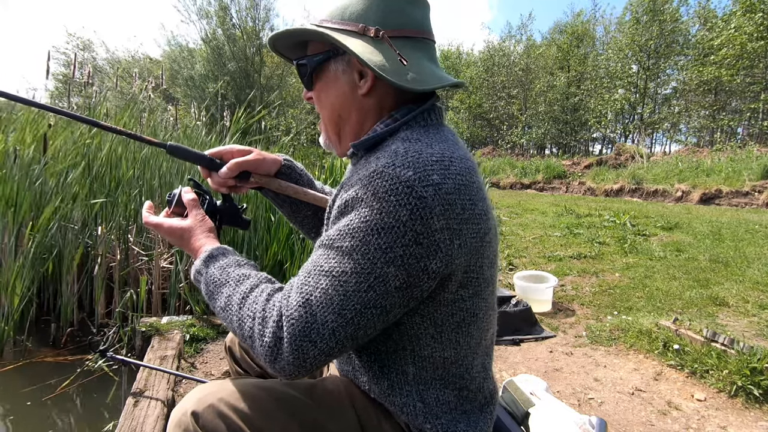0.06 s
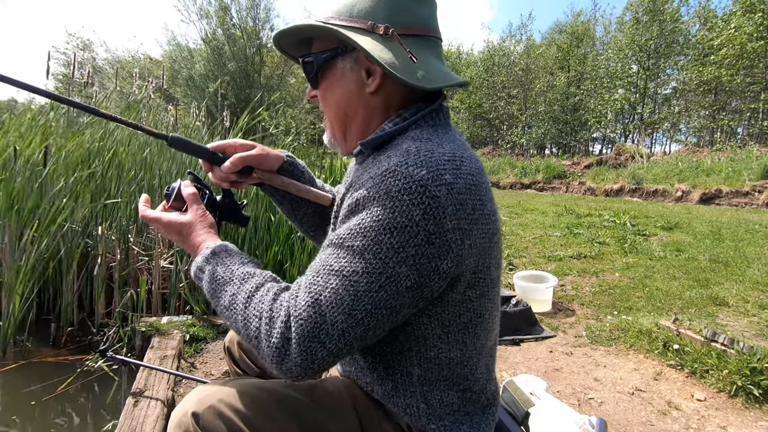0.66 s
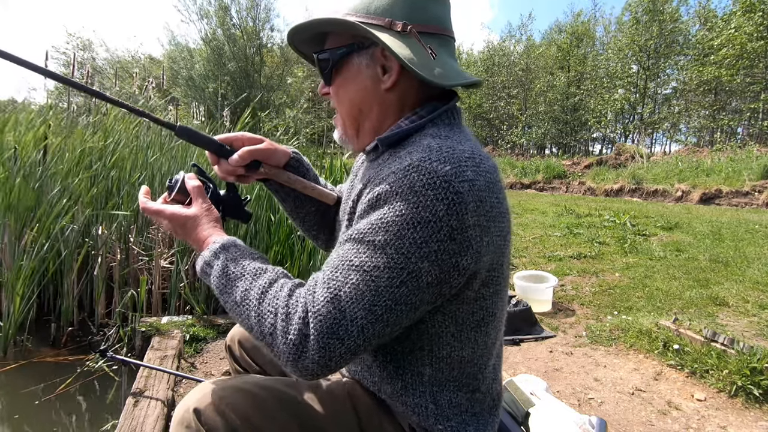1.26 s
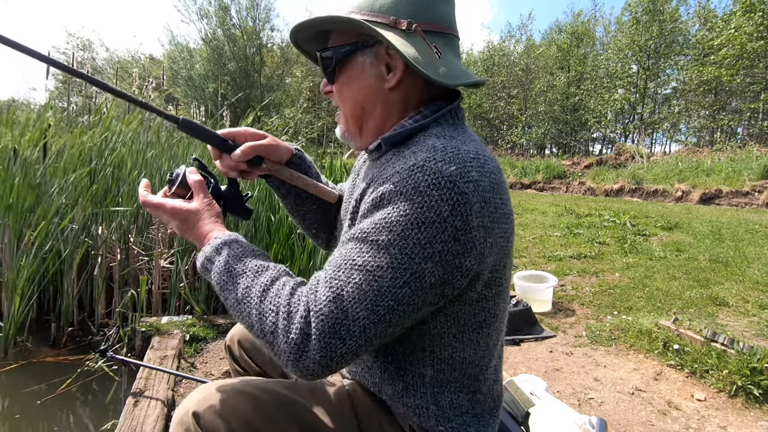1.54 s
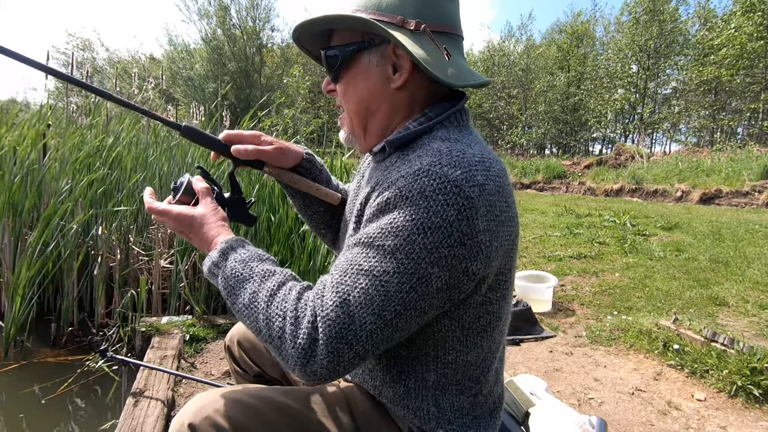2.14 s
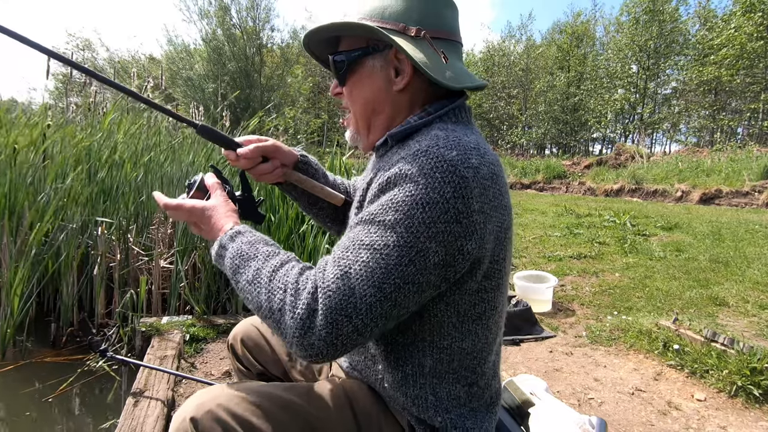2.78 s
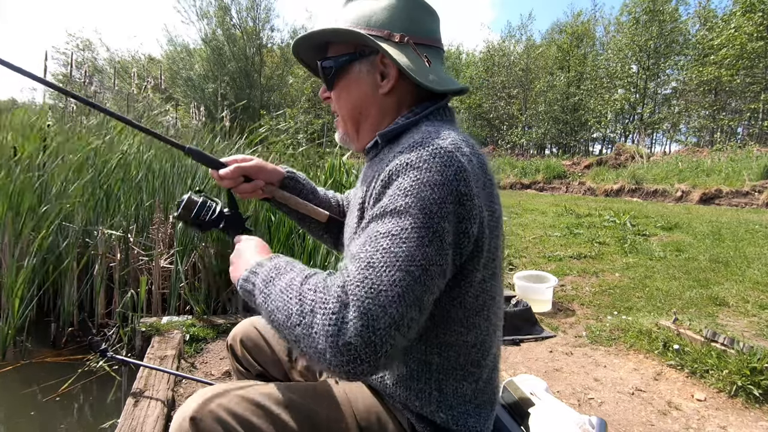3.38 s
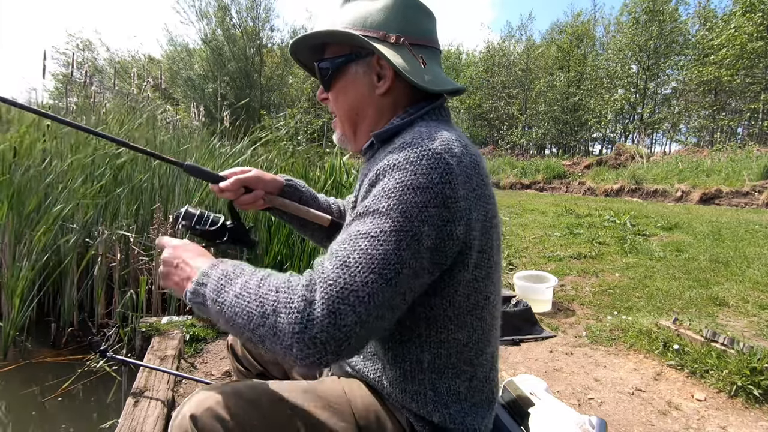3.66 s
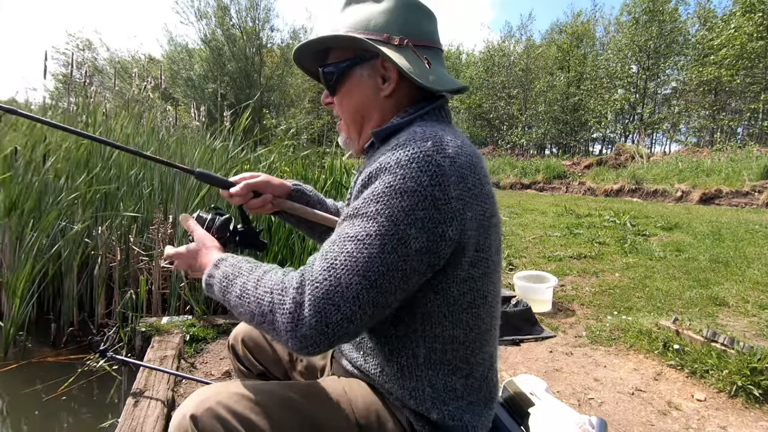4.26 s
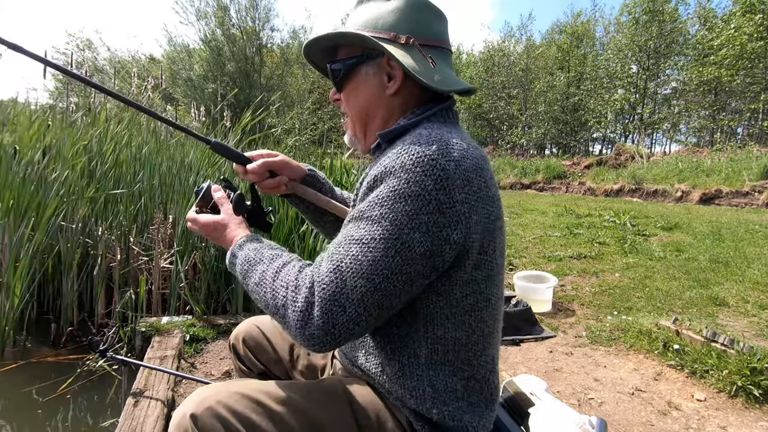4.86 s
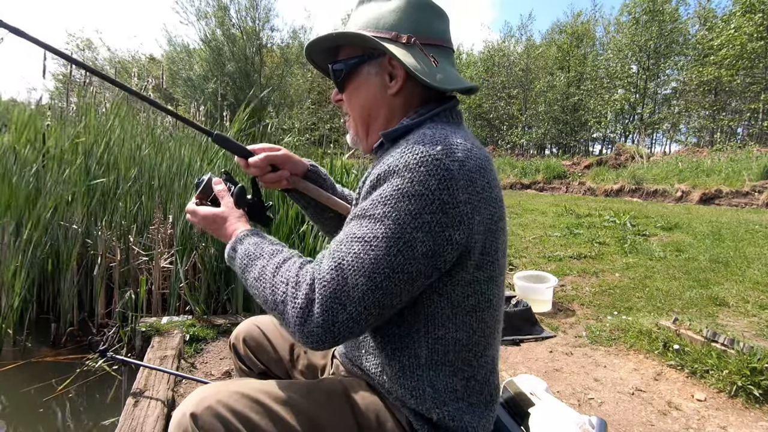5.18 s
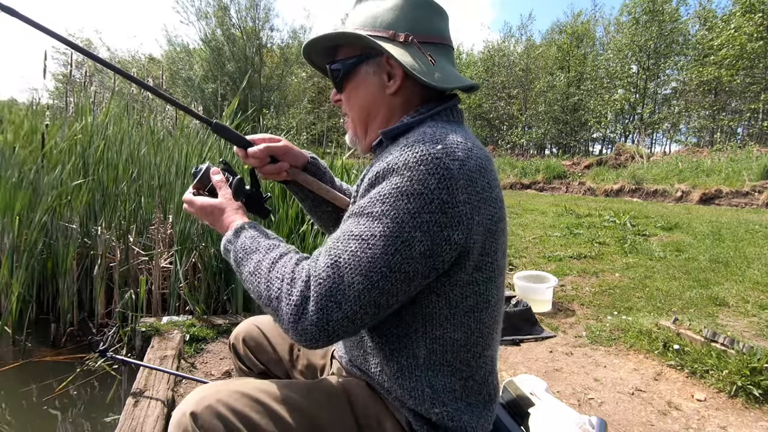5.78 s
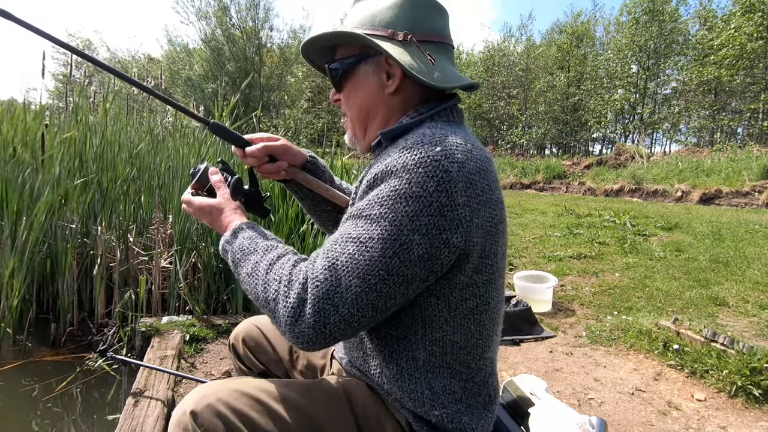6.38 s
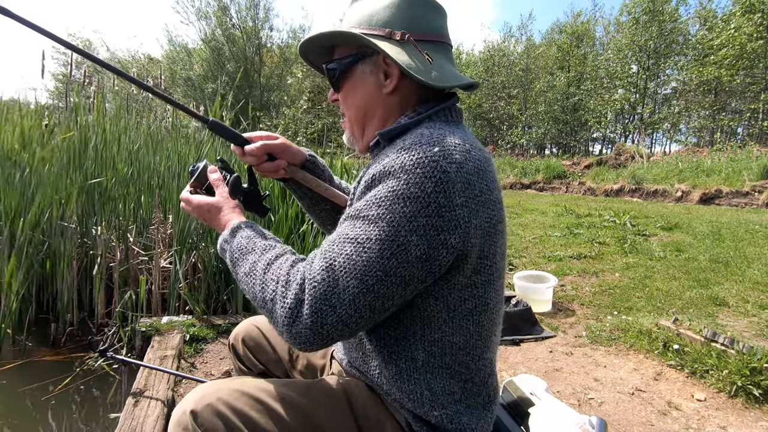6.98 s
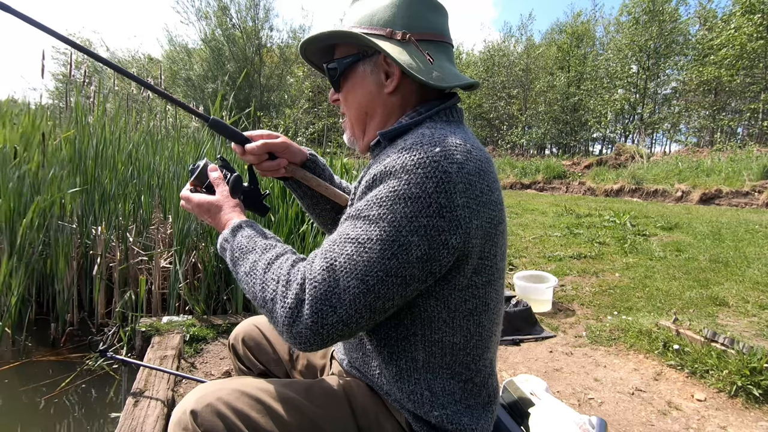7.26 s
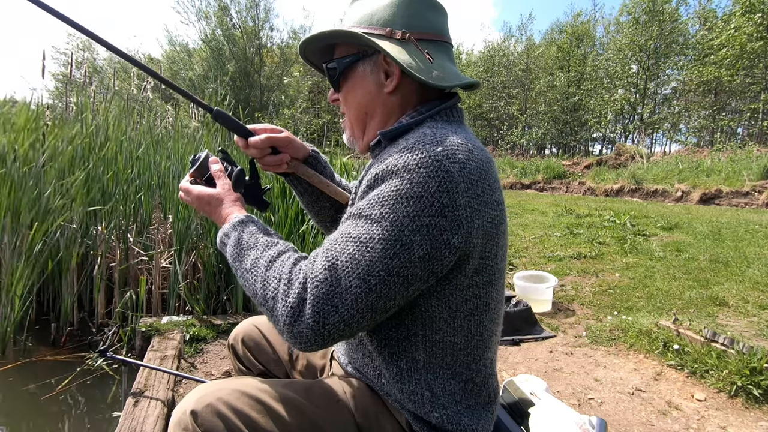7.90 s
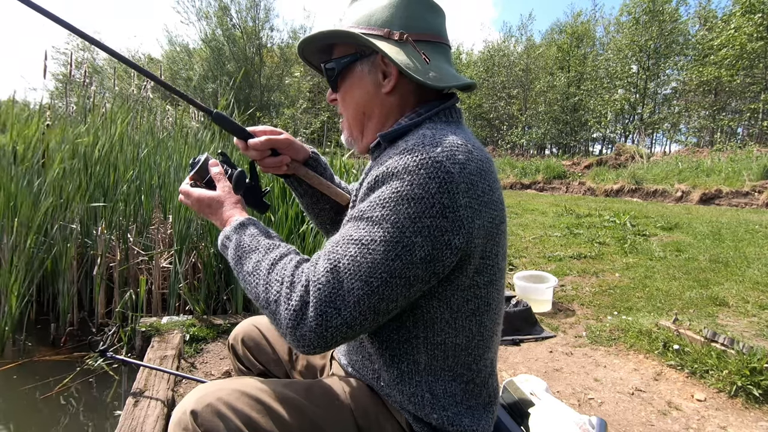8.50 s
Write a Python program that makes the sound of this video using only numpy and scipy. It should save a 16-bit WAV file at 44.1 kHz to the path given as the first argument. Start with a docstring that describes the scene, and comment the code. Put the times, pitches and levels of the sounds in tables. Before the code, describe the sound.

Birds whistle and chirp by a pond over gusting wind, with four far-off gunshots and a fishing reel's clicks and brief chatter.

```python
"""A pond bank: gusts rumble on the microphone over far traffic, leaves and a sinking engine drone.
A small bird gives three thin slurs. A bird in the reeds starts its arched, trilled whistles that break
into a stutter, and another begs in quick, soft notes. Four distant gunshots roll back from the trees.
Between them an angler's reel clicks, then its pawl chatters as line is pulled off. Cloth rustles,
and the tackle takes one soft knock near the end."""
import sys
import numpy as np
from scipy import signal
from scipy.fft import rfft, irfft
from scipy.io import wavfile
from scipy.ndimage import uniform_filter1d

SR = 44100
rng = np.random.default_rng(int(sys.argv[2]) if len(sys.argv) > 2 else 0)


def log_audio(samples):
    """Write samples as a 16-bit WAV file to the path given in sys.argv[1]."""
    # one column per channel
    frames = np.atleast_2d(samples).T
    # limit to full scale, then quantise
    limited = np.clip(frames, -1, 1)
    pcm = np.round(limited * 32767).astype(np.int16)
    wavfile.write(sys.argv[1], SR, pcm)


N = 376261
T = np.arange(N) / SR

# The hoarse breath in a bird's voice. Each row: frequency in Hz, level in dB.
RASP_COLOUR = [(1500, -33), (2000, -11), (2400, -11.5), (2750, -0.5), (3200, 9.5), (3700, -7.5),
               (4400, -3.5), (5000, -6), (5600, -14), (7000, -28.5), (10000, -27.5), (11500, -45.5),
               (15000, -59)]


def undb(db):
    """Decibels to gain."""
    return 10 ** (np.asarray(db) / 20)


def curve(rows, at):
    """Every value column of a table, joined by straight lines."""
    x, *columns = np.transpose(rows)
    return [np.interp(at, x, c) for c in columns]


def over_bins(points, size):
    """Rows of frequency in Hz and value, spread over the bins of a spectrum."""
    hz, value = np.transpose(points)
    return np.interp(np.log(np.arange(size // 2 + 1) * SR / size + 1), np.log(hz), value)


def noise(colour, size=N, channels=2):
    """Unit noise of a given colour, unrelated between channels."""
    x = irfft(rfft(rng.standard_normal((channels, size))) * undb(over_bins(colour, size)), size)
    return x / x.std()


def walk(rate, size=N):
    """A smooth random wobble with a spread near 1, turning `rate` times a second."""
    k = max(int(SR / rate), 1)
    return 1.202 * uniform_filter1d(np.repeat(rng.standard_normal(size // k + 1), k), k)[:size]


def swells(rows):
    """Bell-shaped swells. Each row: centre in seconds, level in dB, half length in seconds."""
    return sum(undb(db) * np.exp(-((T - s) / half) ** 2) for s, db, half in rows)


def decay(t, t60):
    """An envelope that loses 60 dB in t60 seconds."""
    return np.exp(-np.log(1000) * t / t60)


def pan(left, right, pan_db):
    """Constant-power pan; positive is to the left."""
    pair = np.array([left * undb(pan_db / 2), right * undb(-pan_db / 2)])
    return pair / np.sqrt(np.cosh(pan_db * np.log(10) / 20))


def place(x, pan_db, lag_ms=0):
    """Pan a mono sound and delay its right channel."""
    i = np.arange(len(x))
    return pan(x, x[np.clip(i - round(lag_ms * SR / 1000), 0, i[-1])], pan_db)


def add(out, s, x):
    """Mix x into out from second s."""
    i = max(int(s * SR), 0)
    out[:, i:i + x.shape[1]] += x[:, :N - i]


def scatter(x, wet_db, t60):
    """Reeds and trees send back a diffuse tail."""
    t = T[:SR // 2]
    tail = rng.standard_normal((2, len(t))) * decay(t, t60) * (t > .004)
    tail /= np.sqrt(np.sum(tail ** 2, axis=1, keepdims=True))
    return x + undb(wet_db) * signal.fftconvolve(x, tail, axes=1)[:, :N]


def wind():
    """Eddies buffet the microphone; strong gusts strike its left side harder."""
    # The rumble. Each row: frequency in Hz, level in dB.
    colour = [(12, -12), (25, -0.5), (48, 2), (80, -3), (125, -14), (200, -26.5), (350, -38.5),
              (4000, -110)]
    # The strength of the breeze. Each row: time in seconds, level in dB.
    breeze = [(0, -26), (.85, -16.7), (1.05, -19.5), (1.33, -16.3), (1.65, -23.5), (2.28, -25), (3.55, -18),
              (3.85, -28), (5.2, -27.5), (5.75, -29.5), (6.4, -27.3), (8.53, -30.5)]
    # Sudden buffets. Each row: centre in seconds, level in dB, half length in seconds.
    buffets = [(3.95, -25, .04), (4.29, -20.5, .025), (5.405, -18.5, .05), (7.68, -26, .05),
               (7.99, -22.5, .03), (8.14, -25.5, .015)]
    db = 20 * np.log10(np.hypot(undb(curve(breeze, T)[0]), swells(buffets)))
    eddies = (noise(colour) + .75 * noise(colour, channels=1)) * undb(2 * walk(14))
    return pan(*eddies, pan_db=np.clip(.62 * (db + 33), 0, 8)) * undb(db)


def countryside():
    """Far traffic, alike in both ears, under a wide hush of leaves."""
    # The tone of the bed. Each row: frequency in Hz, level in dB.
    colour = [(53, -20.5), (90, -1), (172, -11), (242, -17), (407, -24), (620, -24), (900, -23),
              (1250, -24.5), (2000, -32.5), (3500, -41.5), (4840, -46.5), (7500, -50.5), (10200, -55),
              (11500, -70), (15500, -100)]
    # Its fader ride. Each row: time in seconds, level in dB.
    ride = [(0, -38), (1.1, -37.5), (2.6, -38), (4.6, -38), (5.9, -37.5), (7, -40), (8.5, -41.5)]
    # Its stereo image. Each row: frequency in Hz, likeness of left and right (1 is mono).
    image = [(100, 0.94), (290, 1), (640, 0.37), (1400, 0.11), (8000, 0.051)]
    likeness = over_bins(image, N)
    mid, side = irfft(rfft(noise(colour)) * np.sqrt([1 + likeness, 1 - likeness]), N)
    air = np.array([(mid + side) * undb(4), (mid - side) * undb(2)]) / np.sqrt(2)
    return air * undb(curve(ride, T)[0] + .57 * walk(6))


def far_engine():
    """A low, wavering drone that sinks and fades."""
    # Each row: time in seconds, pitch in Hz, level in dB.
    drone = [(0, 168.2, -36), (1, 164, -34), (2.2, 161.4, -36.5), (3.3, 156.2, -38), (3.7, 152.5, -36.5)]
    hz, db = curve(drone, T)
    phase = 2 * np.pi * np.cumsum(hz * (1 + .00844 * walk(12))) / SR
    fade = np.clip((drone[-1][0] + .55 - T) / .28, 0, 1)
    return place(np.sin(phase) * undb(db + 2.4 * walk(9) + .5) * fade, pan_db=-.5)


def small_bird():
    """Thin, pure slurs from further off: each swoops down to a pitch, lingers and slides away."""
    # Each row: centre in seconds, opening, middle and closing pitch in Hz, level in dB.
    slurs = [(.003, 4800, 3910, 6000, -58), (0.189, 4900, 3920, 6460, -55.5), (.392, 4700, 3790, 2980, -58)]
    half_s, fade_db_per_hz = .052, .008  # the higher, the fainter
    tone = np.zeros(N)
    for s, open_hz, middle_hz, close_hz, db in slurs:
        along = np.clip((T - s) / half_s, -1, 1)
        bend = (np.where(along < 0, open_hz, close_hz) - middle_hz) * along ** 2
        fade = np.sqrt(1 - along ** 2) * undb(db - fade_db_per_hz * bend)
        tone += np.sqrt(2) * fade * np.sin(2 * np.pi * np.cumsum(middle_hz + bend) / SR)
    return scatter(place(tone, pan_db=5), wet_db=-2, t60=.6)


def trill_voice(t, hz, bright_db, sixth_db, sixth_gate):
    """Partials lifted as they cross the throat's resonances, topped by a shrill sixth,
    which the recorder faintly mirrors near 14 kHz."""
    # Each row: multiple of the pitch, level in dB, share of the brightness that it follows.
    partials = [(1, -9, 0.037), (2, 0.5, 0.051), (3, -3.5, 0.95), (4, -18, 0.91), (5, -36, 0.2)]
    # The throat's resonances. Each row: centre in Hz, width in Hz, lift in dB.
    throat = [(2900, 350, 1.5), (4400, 450, 7.5)]
    phase = 2 * np.pi * np.cumsum(hz) / SR
    voice = 0
    for k, db, share in partials:
        lift_db = sum(peak * np.exp(-((k * hz - centre) / width) ** 2) for centre, width, peak in throat)
        voice += undb(db + share * bright_db + lift_db + 1.9 * walk(117.1, len(t))) * np.sin(k * phase)
    shrill = undb(sixth_db + .5 * walk(900, len(t))) * sixth_gate
    sixth_phase = 6 * phase + .9 * walk(900, len(t))
    recorder_mirror = undb(-20) * np.sin(2 * np.pi * 24000 * t - sixth_phase)
    return np.sqrt(2) * (voice + shrill * (np.sin(sixth_phase) + recorder_mirror))


def trill_call(start, lead, whistle_s, stutter_s, last_s, top_hz, open_share, close_share, rate,
               dip_share, whistle_rough, whistle_db, bright_db, stutter_db, hoarse, last_db, sixth_db):
    """An arched whistle, chopped ever deeper by its trill, breaks into chips and a falling last note."""
    # The whistle's swell. Each row: share of its length, level in dB, brightness in dB.
    swell = [(0, -4, 5), (.12, -2, 5), (.32, 0, 1), (.6, -.5, -3), (.85, -1, -4), (1, -3.5, -3)]
    crest, chip_low_hz, last_home_hz = .28, 1172, 1660  # the pitch crests early in the whistle
    first, break_at = start - lead, start + whistle_s
    last_at = break_at + stutter_s
    end = last_at + last_s
    t = np.arange(first, end, 1 / SR)
    along = np.clip((t - start) / whistle_s, 0, 1)
    beat = ((t - start) * rate) % 1
    trilling = np.clip(2 * (t - start) * rate, 0, 1)

    # Crossfade whistle, stutter and last note; a lead-in longer than one trill comes out as chips.
    opening = np.clip((start + .003 - t) / .003, 0, 1) * (lead * rate > 1)
    broken = np.maximum(np.clip((t - break_at) / .03 + .5, 0, 1), opening)
    last = np.clip((t - last_at) / .004, 0, 1)
    whistle, stutter = (1 - broken) * (1 - last), broken * (1 - last)

    rising = np.maximum(1 - along / crest, 0)
    falling = np.maximum(along - crest, 0) / (1 - crest)
    arch = 1 - (1 - open_share) * rising ** 2 - (1 - close_share) * falling ** 1.7
    # Each trill sags, plunges at its end and snaps back up.
    sag = .014 * (.3 + 1.5 * along ** 2) * (beat - .4)
    dip = np.maximum(np.clip((beat - .65) / .35, 0, 1), np.clip(1 - beat / .26, 0, 1)) ** 2 * trilling
    whistle_hz = top_hz * arch * (1.004 - dip_share * dip - sag)
    chip_hz = chip_low_hz + (.98 * top_hz - chip_low_hz) * (1 - beat) ** 2.6
    slide = np.clip(1 - (end - t) / .04, 0, 1) ** 1.5
    last_hz = (top_hz + last_home_hz) / 2 * (1.01 - .1 * slide - .05 * dip)
    hz = whistle * whistle_hz + stutter * chip_hz + last * last_hz
    rough = whistle * (whistle_rough + .048 * dip) + .055 * stutter * (1 - .68 * beat) + .032 * last
    hz *= 1 + rough * walk(2200, len(t)) + (.003 + .02 * stutter) * walk(50, len(t))

    # The airflow is pinched between trills and shuts between chips.
    pinch = .8 * np.cos(np.pi * beat) ** 8 * (.55 + .65 * along) * trilling
    chip = np.clip(np.minimum(beat - .12, .98 - beat) / .25, 0, 1)
    swell_db, edge_db = curve(swell, along)
    flow = (whistle * (1 - pinch) * undb(whistle_db + swell_db + .5)
            + stutter * chip * undb(stutter_db + 4.5)
            + last * (1 - pinch / 2) * undb(last_db))
    flow *= np.clip(np.minimum(t - first, end - t) / .007, 0, 1) * undb(1.1 * walk(50, len(t)))

    bright_db = whistle * (bright_db + edge_db) + (1 - whistle) * (.5 * bright_db - 7)
    voice = trill_voice(t, hz, bright_db, sixth_db + 17 * (along - .5), sixth_gate=whistle + last / 2)
    # The voice catches in each dip, and in a hoarse chip the tone gives way to rasp.
    catch = undb(-2) * whistle * np.sqrt(dip)
    croak = undb(2) * hoarse * (stutter * (1 - beat / 2) + last)
    rasp = noise(RASP_COLOUR, len(t), channels=1)[0] * (undb(-13.5) + catch + croak)
    return (voice * (1 - hoarse * stutter) + rasp) * flow


def trilling_bird():
    """Nine calls from a bird moving right to left through the reeds."""
    # Each row: whistle start, then lead-in, whistle, stutter and last note lengths, all in seconds;
    # top pitch in Hz, opening and closing pitch as shares of it, trills per second, pitch dip and
    # roughness as shares; whistle level, brightness and stutter level in dB, hoarse share,
    # last note and sixth partial levels in dB.
    calls = [(.512, .009, .298, .15, .037, 1762, .955, .875, 49.5, .11, .011, -44.6, -6.5, -52, .7, -54, -38),
             (1.991, .013, .344, .132, .036, 1760, .95, .89, 48.8, .11, .011, -40.3, -6, -47, .45, -45, -38),
             (3.452, .008, .3, .133, .042, 1760, .915, .84, 48.9, .11, .011, -34.8, -10.5, -43, .6, -43.5, -41),
             (4.143, .033, .219, .145, .04, 1660, .925, .885, 49.3, .16, .03, -41.5, 1, -43, .35, -43, -31),
             (4.749, .035, .216, .15, .043, 1660, .98, .92, 50.3, .17, .022, -41, .5, -41.5, .3, -44.5, -29),
             (5.351, .031, .224, .125, .06, 1615, .95, .92, 49.8, .08, .013, -37.8, -12, -37, .18, -41, -35),
             (5.949, .035, .205, .12, .062, 1615, .94, .905, 49, .11, .011, -35.8, -15, -37, .3, -40, -37),
             (6.515, .033, .241, .087, .064, 1600, .95, .925, 46.8, .11, .011, -35.2, -19, -37, .35, -39.5, -32),
             (7.311, .012, .314, .115, .045, 1690, .95, .915, 44.8, .085, .011, -39.3, -11.5, -48.5, .8, -47, -23.5)]
    # Each row: time in seconds, left minus right in dB.
    path = [(.5, -3.5), (4.75, 1.3), (5.95, 13), (7.3, 10)]
    out = np.zeros((2, N))
    for start, lead, *voice in calls:
        pan_db = curve(path, start)[0]
        call = trill_call(start, lead, *voice)
        add(out, start - lead, place(call, pan_db, lag_ms=.027 * max(pan_db, 0)))
    return scatter(out * undb(-.08), wet_db=-9, t60=.52)


def begging_bird():
    """A soft, hoarse note about six times a second, each a little different."""
    # One note. Each row: seconds from its middle, pitch in Hz, level in dB.
    shape = [(-.065, 1293, -18), (-.048, 1358, -6), (-.034, 1318, -10.5), (-.025, 1175, -3), (0, 1215, -1),
             (.018, 1255, -2.5), (.033, 1237, -13.5), (.048, 1128, -4)]
    # Each row: multiple of the pitch, level in dB.
    partials = [(1, -5), (2, 1.5), (3, -5.5), (4, -8), (5, -11.5), (6, -33), (8, -30)]
    # Each row: middle of a bout's first note in seconds, number of notes.
    bouts = [(.597, 2), (1.125, 9), (2.699, 37)]
    # How hard it begs. Each row: time in seconds, level in dB, share of its usual pitch.
    effort = [(.75, -44, 0.96), (1.15, -52, 0.94), (1.77, -51.5, 1), (2.1, -47, 0.94), (2.7, -43, 0.99),
              (3.5, -38, 1.02), (5, -42.5, 1), (7.2, -44.5, 1.034), (7.55, -38.5, 1.01),
              (8.5, -45.5, 1.016)]
    period_s, dulling = .1611, .073  # high partials drop faster where the note is quiet
    out = np.zeros((2, N))
    t = np.arange(shape[0][0], shape[-1][0], 1 / SR)
    hz, shape_db = curve(shape, t)
    for s in np.concatenate([first + period_s * np.arange(count) for first, count in bouts]):
        level_db, drift = curve(effort, s)
        late, louder, higher = rng.standard_normal(3)
        waver = 1 + .008 * higher + .012 * walk(60, len(t)) + .017 * walk(1100, len(t))
        phase = 2 * np.pi * np.cumsum(hz * drift * waver) / SR
        note = sum(undb(db + dulling * (k + 1) * shape_db + 4.2 * walk(104, len(t))) * np.sin(k * phase)
                   for k, db in partials)
        note += undb(-9.5) * noise(RASP_COLOUR, len(t), channels=1)[0]
        note *= undb(level_db + shape_db + 1.2 * louder)
        add(out, s + t[0] + .002 * late, place(note, pan_db=3.5, lag_ms=.26))
    return scatter(out, wet_db=-3.5, t60=.36)


def gunshots():
    """Each blast opens with a thump, peaks in a crack, echoes off the trees and rolls away."""
    # Each row: start in seconds, blast in dB, rise and fall in seconds, crack, thump and tail in dB.
    shots = [(1.221, -9.5, 0.013, 0.017, 0, -25, -24.5), (1.866, -15.5, .012, 0.022, 1, -30, -25.5),
             (3.923, -15.5, 0.025, 0.025, -37, -8, -24), (5.312, -21.5, 0.014, 0.03, -36, -19, -24)]
    # Echoes from the tree line. Each row: centre in seconds, level in dB, half length in seconds.
    echoes = [(1.295, -33.5, 0.015), (1.425, -36, 0.012), (1.9, -25, 0.02), (2.0, -31.5, .007),
              (4.018, -24, 0.035), (4.094, -27.5, 0.0046), (5.385, -24, 0.014), (5.417, -26, 0.024),
              (5.49, -34.5, 0.016)]
    # The tone of blast, rolling tail and echo. Each row: frequency in Hz, level in dB.
    blast_colour = [(40, -8), (130, 5), (250, 0), (430, -2), (850, -6.5), (1150, -8), (1500, -17),
                    (2200, -24.5), (3000, -27.5), (4000, -74), (9000, -101)]
    roll_colour = [(60, 12.5), (200, -2.5), (450, -2), (1000, 0), (1400, -6.5), (2200, -14.5), (3200, -35),
                   (11000, -92)]
    echo_colour = [(100, -26), (450, -10), (750, 0), (1000, 0.5), (1200, -3.5), (1500, -16.5), (2200, -23),
                   (3200, -23), (9000, -89)]
    # The shots lean left. Each row: frequency in Hz, added left minus right in dB.
    lean = [(150, 1.5), (300, 1.5), (550, 2), (1000, 14.5), (2000, 10.5)]
    thump_hz, thump_s, crack_hz, roll_attack_s = 130, .0026, 880, .034
    out, t = np.zeros((2, N)), T[:SR * 3 // 2]
    for s, blast_db, rise, fall, crack_db, thump_db, tail_db in shots:
        past_peak = np.maximum(t - rise, 0)
        swell = undb(blast_db) * np.where(t < rise, (t / rise) ** .62, np.exp(-past_peak / fall))
        thump = undb(thump_db) * np.sin(2 * np.pi * thump_hz * t)  # the pressure front
        thump *= t / thump_s * np.exp((1 - (t / thump_s) ** 2) / 2)
        crack = undb(crack_db) * np.sin(2 * np.pi * crack_hz * past_peak)
        crack *= np.exp(-past_peak / .0023) * (1 - np.exp(-past_peak / .00028))
        rolling = undb(tail_db + 2.3 * walk(45, len(t))) * decay(t, t60=1.5)
        rolling *= np.clip(t / roll_attack_s, 0, 1)
        blast = swell * noise(blast_colour, len(t), channels=1)[0]
        tail = .88 * rolling * noise(roll_colour, len(t), channels=1)[0]
        around = (.81 * swell + .45 * rolling) * noise(roll_colour, len(t))
        add(out, s, place(thump + crack + blast + tail, pan_db=-3, lag_ms=.12) + around)
    out += swells(echoes) * (.68 * noise(echo_colour, channels=1) + .5 * noise(echo_colour))
    lean_db = over_bins(lean, N)
    return irfft(rfft(out) * undb([lean_db / 4, -3 * lean_db / 4]), N)


def reel():
    """The pawl snaps over each tooth and rings the spool; the line hisses in step with its speed."""
    # Lone clicks: the reel being handled, and the pawl's slow first and last teeth as line is pulled. Each row:
    # start in seconds, level in dB.
    clicks = [(2.4992, -48.5), (3.1602, -33), (3.3404, -42.5), (3.381, -34.5), (3.5112, -32), (3.578, -38),
              (3.6195, -38), (3.6594, -34), (3.7228, -37.5), (4.3865, -36), (4.446, -44), (4.6897, -38.5),
              (4.7012, -40)]
    # One pull of line turns the spool. Each row: time in seconds, ratchet teeth per second.
    pull = [(3.754, 32), (3.855, 37), (3.919, 57), (3.991, 82), (4.043, 72), (4.112, 72), (4.172, 63),
            (4.33, 70), (4.38, 25)]
    # How hard the pawl strikes during the pull. Each row: time in seconds, level in dB.
    force = [(3.75, -40.5), (3.83, -42), (3.89, -38), (3.95, -33.5), (4.06, -32), (4.18, -36), (4.35, -45)]
    # The tone of snap and hiss. Each row: frequency in Hz, level in dB.
    colour = [(100, -36), (2500, 0), (4300, 0), (6500, -2), (10200, -6), (11300, -13.5), (14000, -20),
              (15500, -33)]
    # The reel's ring. Each row: frequency in Hz, level in dB, seconds to lose 60 dB.
    modes = [(4280, 8, 0.023), (4180, -4, 0.018), (4470, 6, 0.012), (5290, -2.5, 0.035),
             (7540, -6.5, 0.053), (9760, -14.5, 0.095), (9720, -22, 0.045)]
    out, t = np.zeros((2, N)), T[:SR // 10]
    speed = np.interp(T, *np.transpose(pull), left=0, right=0)
    teeth = T[1:][np.diff(np.ceil(np.cumsum(speed) / SR)) > 0]
    teeth_db = curve(force, teeth)[0] + 2.2 * rng.standard_normal(len(teeth))
    for s, db in [*clicks, *zip(teeth, teeth_db)]:
        snap = noise(colour, len(t)) * (1.45 * np.exp(-t / .0016) + .11 * np.exp(-t / .01))
        ring = 0
        for hz, mode_db, t60 in modes:
            louder, higher = rng.standard_normal((2, 2, 1))
            tone = np.sin(2 * np.pi * hz * (1 + .02 * higher) * t)
            ring += undb(mode_db + 2.1 * louder) * tone * decay(t, t60)
        click = (undb(-1) * snap + undb(-6.5) * ring) * np.clip(t / .0012, 0, 1)
        add(out, s + .001, undb(db) * click)
    line_db, flicker_db, coast_s = -51.3, 3.4, .16
    running = np.abs(uniform_filter1d(speed, int(coast_s * SR))) / speed.max()
    hiss = noise(colour) * running * undb(line_db + flicker_db * walk(200))
    return scatter((out + hiss) * undb([[-1.1], [1.1]]), wet_db=-12, t60=.22)


def rustles():
    """Heavy cloth gives a dull brush as the angler shifts."""
    # Each row: frequency in Hz, level in dB.
    cloth = [(60, -3), (130, 7), (280, -1.5), (500, -31), (2200, -22.5), (3500, -30), (12000, -64)]
    # Each row: centre in seconds, level in dB, half length in seconds.
    moves = [(4.56, -39.5, 0.26), (5.208, -36.5, 0.057), (7.66, -37, 0.044), (8.146, -36, 0.024)]
    return noise(cloth, channels=1) * swells(moves) * undb(5.4 * walk(60))


def knock():
    """One soft, hollow bump as the tackle is handled."""
    # Each row: frequency in Hz, level in dB.
    colour = [(200, -11), (500, -10), (900, 1), (1300, -4), (2000, -2), (2800, -25), (8000, -50)]
    # One row: centre in seconds, level in dB, half length in seconds.
    bump = [(8.15, -45, .025)]
    return place(noise(colour, channels=1)[0] * swells(bump), pan_db=5)


def scene():
    """Everything heard from the bank."""
    bed = wind() + countryside() + far_engine()
    birds = small_bird() + trilling_bird() + begging_bird()
    return bed + birds + gunshots() + reel() + rustles() + knock()


def record(dry):
    """The recorder rounds off the very highest peaks and cuts the top."""
    top_hz = 15700
    rounded = dry / (1 + dry ** 6) ** (1 / 6)
    return signal.sosfilt(signal.ellip(8, .2, 70, top_hz, fs=SR, output="sos"), rounded)


dry = scene()
out = record(dry)
log_audio(out)
```